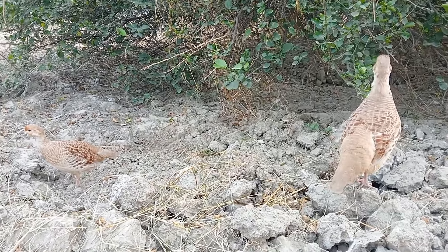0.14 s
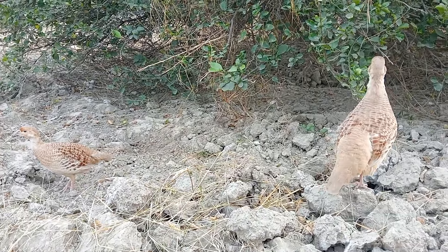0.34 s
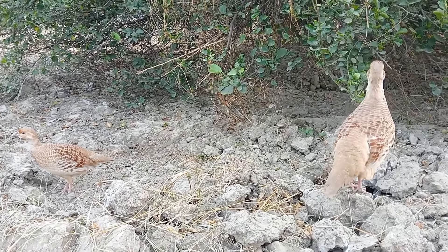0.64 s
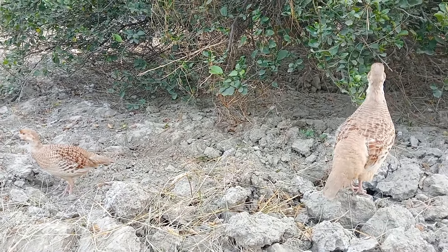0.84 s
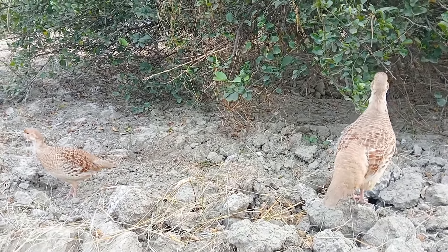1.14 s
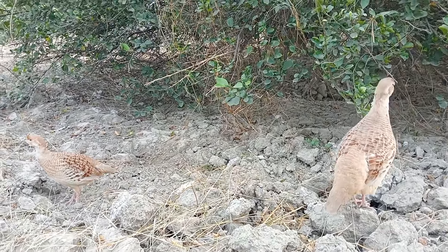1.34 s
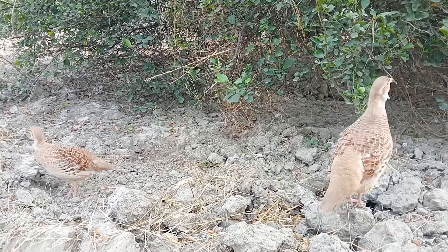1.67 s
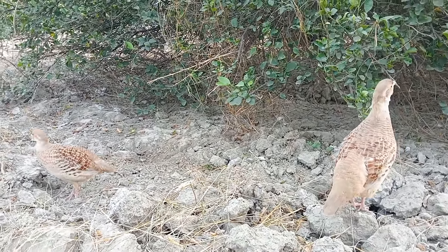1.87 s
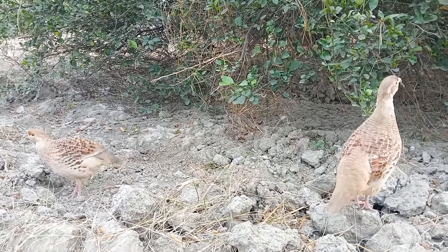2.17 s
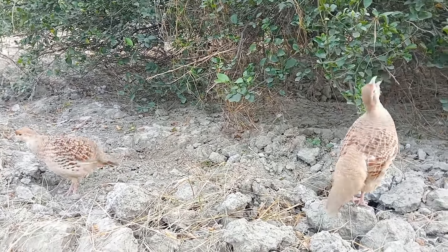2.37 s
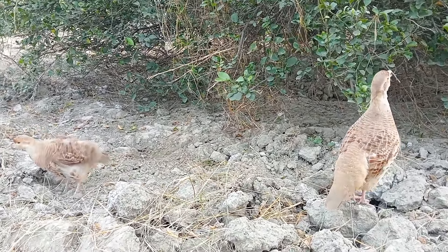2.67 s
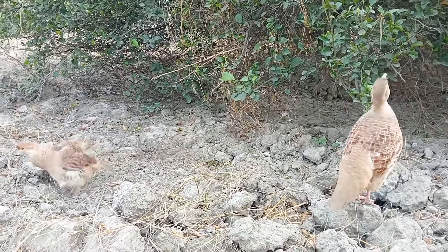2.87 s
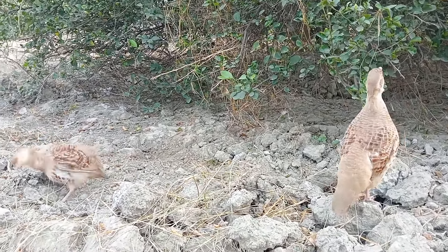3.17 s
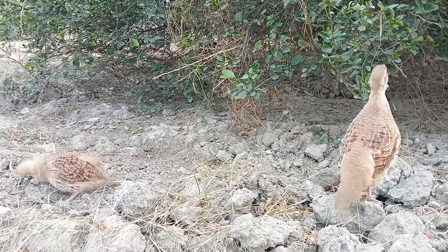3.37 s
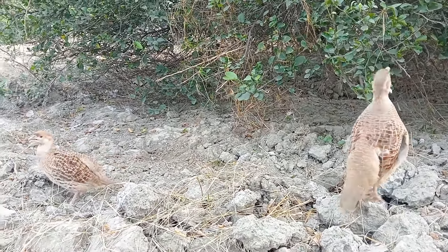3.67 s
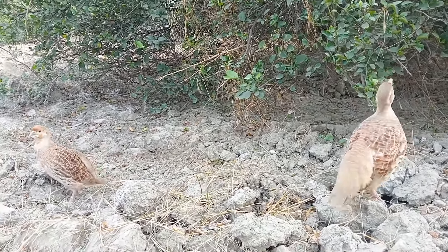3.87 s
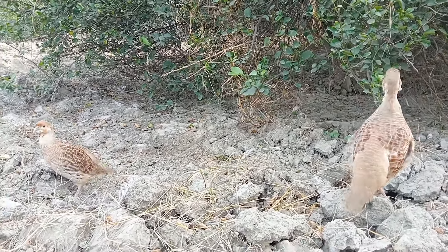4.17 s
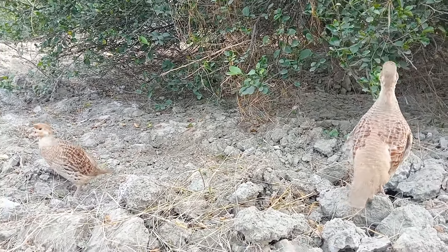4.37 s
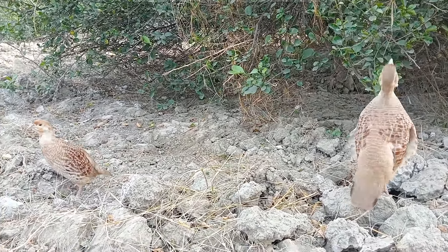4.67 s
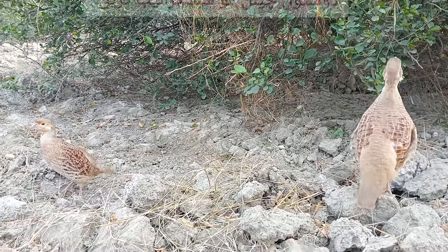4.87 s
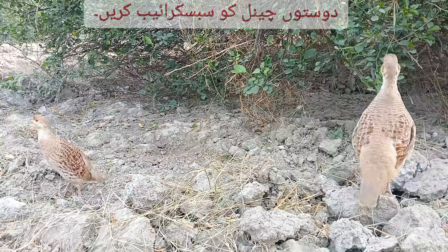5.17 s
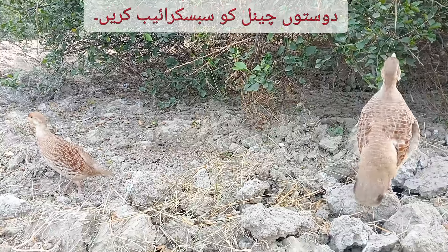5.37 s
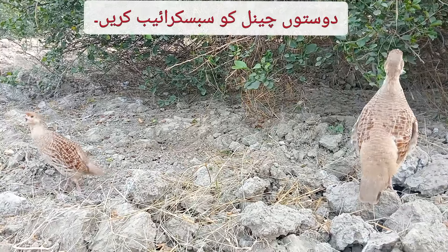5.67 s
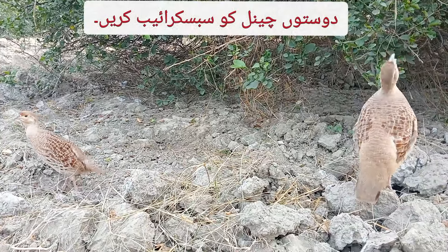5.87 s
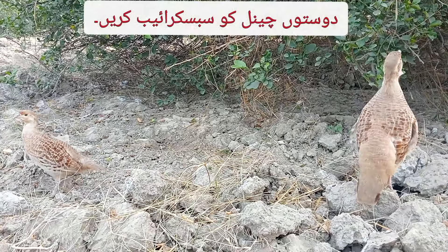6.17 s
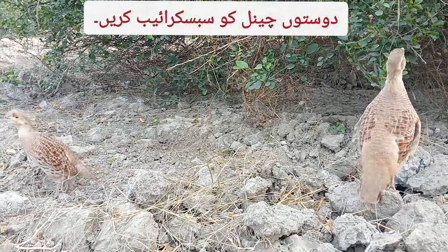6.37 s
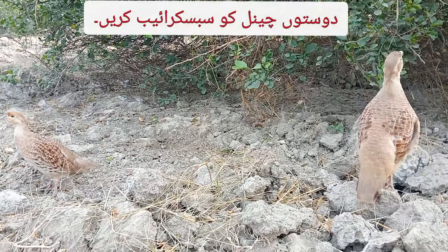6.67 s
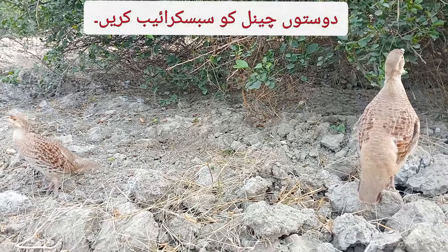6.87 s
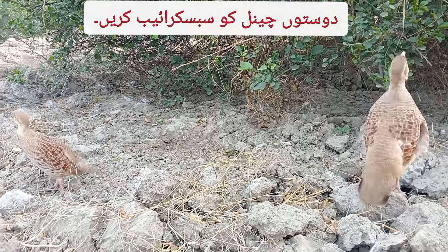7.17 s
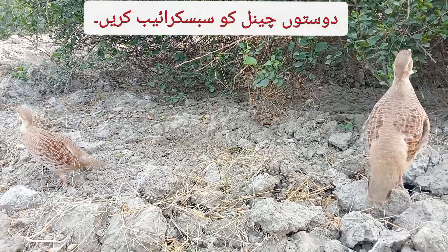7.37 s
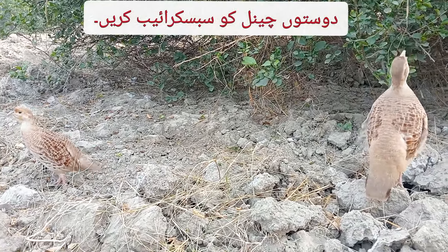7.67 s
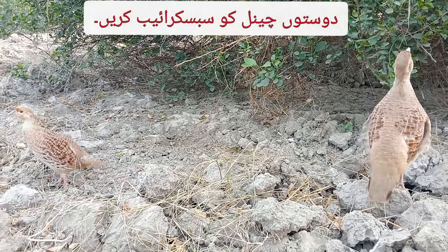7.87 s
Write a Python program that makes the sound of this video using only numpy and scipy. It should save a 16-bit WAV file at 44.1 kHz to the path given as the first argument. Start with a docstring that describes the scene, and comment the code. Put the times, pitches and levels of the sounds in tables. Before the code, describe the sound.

Close, shrill partridge calls repeat in a quick rhythm of clucks, whistles and harsh falling notes over faint open-air hiss.

```python
"""Low rumble, hiss and faint whistles on open ground; then a close grey francolin pips and mutters.
It repeats one phrase: clucks, a yelp into a whistle, a rasping 'kee' and a falling slur.
Its calls join rough rattles and sinking tones: syrinx pulses filtered by windpipe, throat and beak.
Stones and trees return a faint echo; a few dry ticks and rustles lie underneath.
Gain control ducks the whole mix under the loudest notes."""
import sys
import numpy as np
from scipy import signal
from scipy.fft import rfft, irfft, next_fast_len
from scipy.io import wavfile
from scipy.ndimage import uniform_filter1d, minimum_filter1d

SR = 44100
rng = np.random.default_rng(int(sys.argv[2]) if len(sys.argv) > 2 else 0)


def dump(signal):
    """Clip the signal to [-1, 1] and save it as 16-bit WAV at the path in sys.argv[1]."""
    limited = np.clip(np.atleast_2d(signal).T, -1, 1)
    pcm = np.round(limited * 32767).astype(np.int16)
    wavfile.write(sys.argv[1], SR, pcm)


N = 353682

# 'Kee' calls. Each row: tone start in seconds, tone level in dB, nominal pitch in Hz,
# then rattle length, slur delay and slur length in seconds.
KEE_CALLS = [(2.428, -1, 2078, .041, .063, .072), (3.008, -1, 2090, .042, .060, .074),
             (3.607, 0, 2088, .039, .064, .071), (3.987, -2, 2140, .048, .057, .071),
             (4.663, 0, 2106, .047, .059, .079), (5.351, -1, 2070, .043, .064, .079),
             (5.949, -1, 2070, .043, .063, .079), (6.551, -1, 2090, .043, .064, .079),
             (7.163, -1, 2078, .045, .063, .079), (7.767, -1, 2080, .044, .065, .079)]
# Clucks. Each row: tone start in seconds, rattle and tone levels in dB, pitch factor,
# tone length in seconds.
CLUCK_CALLS = [(2.680, -14, -12, .91, .046), (2.796, -15, -11, .89, .044), (3.267, -14, -11, 1.03, .043),
               (3.379, -14, -7, 1.02, .046), (3.503, -14, -13, .94, .022), (4.229, -12, -7, 1.06, .041),
               (4.344, -14, -7, 1.02, .040), (4.464, -17, -12, .96, .035), (4.927, -11, -9, 1.01, .043),
               (5.042, -13, -7, .95, .038), (5.163, -17, -15, .9, .036), (5.623, -13, -10, 1, .041),
               (5.734, -19, -17, .9, .036), (6.213, -13, -10, 1.01, .040), (6.331, -15, -12, .92, .046),
               (6.816, -12, -9, 1, .043), (6.936, -15, -13, .94, .046), (7.427, -12, -9, .98, .042),
               (7.541, -18, -16, .9, .038), (8.034, -11, -9, 1.1, .042)]
# Whistles. Each row: tone start in seconds, level in dB, pitch in Hz, length in seconds, mid sag in dB.
WHISTLE_CALLS = [(4.507, -8, 2456, .080, 0), (5.210, -8, 2468, .076, 0), (5.773, -9, 2458, .074, -1),
                 (6.399, -8, 2484, .073, -5), (7.003, -9, 2465, .075, -7), (7.592, -9, 2458, .071, -7)]
# Register jump. One row: tone start in seconds, nominal level in dB, low and high pitch in Hz,
# low and high length in seconds.
YODEL_CALL = (3.818, -9, 2430, 2962, .028, .046)
# Sharp pip. One row: tone start in seconds, level in dB.
PIP_CALL = (1.610, -10)
# Soft low notes. Each row: start and length in seconds, level in dB, mid pitch in Hz, glide in octaves.
MUTTER_CALLS = [(1.530, .05, -49, 480, -.7), (1.701, .048, -23, 530, -.2), (1.800, .048, -24, 530, -.1),
                (2.116, .05, -50, 560, -.8), (2.152, .08, -49, 510, -.9), (2.203, .075, -47, 560, -.9),
                (2.893, .026, -25, 800, 0)]
# Windpipe and beak response, for calls and for whistles. Each row: frequency in Hz, gain in dB.
CALL_TRACT = [(150, -47), (400, -13), (650, -10.5), (1050, -8.5), (1500, -3), (2100, -4.5), (3100, -2.5),
              (4200, -3.5), (5200, -3.5), (6200, -16), (7100, -33), (8500, -28), (12300, -43.5),
              (14800, -33.5)]
WHISTLE_TRACT = [(150, -42.5), (600, -39.5), (1050, 1.5), (1600, -3.5), (2500, -1.5), (4000, 8.5),
                 (5000, -2), (5950, 2), (6600, -15), (7400, -12.5), (8700, -17.5), (9900, -16.5),
                 (12300, -26.5), (14800, -23.5)]
# Thin, faint whistles. First three rows: fading ring of an earlier close call, with its overtones.
# Last two: late echoes of the francolin's whistles. Each row: start and length in seconds, level in dB,
# start, middle and end pitch in Hz, rms waver as a fraction of pitch.
FAINT_WHISTLES = [(-.12, 0.25, -55, 1790, 1750, 1750, 0.03), (-.12, 0.21, -65, 3580, 3570, 3560, .008),
                  (-.12, 0.21, -64, 5350, 5330, 5300, 0.02), (.62, 0.41, -60.5, 2280, 2090, 1950, 0.06),
                  (1.45, .11, -66, 3050, 3230, 2850, 0.03), (1.74, 0.11, -63, 2950, 3180, 3100, .004),
                  (1.86, .28, -61.5, 2300, 2150, 2010, 0.05), (2.03, 0.11, -62, 2800, 3120, 2670, 0.05),
                  (4.80, 0.46, -48.5, 2490, 2470, 2430, 0.02), (6.68, .3, -45.5, 2470, 2470, 2450, .006)]
# Far-off steady tones, same columns.
DISTANT_TONES = [(0, .85, -68, 810, 805, 800, .004), (.82, .45, -64, 645, 640, 638, .004),
                 (1.2, .5, -71, 640, 638, 636, .004), (.3, 1.1, -69, 1580, 1590, 1590, .012)]
# Dry ticks. Each row: start in seconds, peak in dB.
DRY_TICKS = [(2.070, -21), (2.769, -30), (2.891, -34)]
# Scuffs on dry ground. Each row: start and length in seconds, level in dB, centre in Hz.
GROUND_RUSTLES = [(.36, .25, -68, 3700), (1.17, .3, -76, 7500), (1.1, .45, -70, 3500),
                  (2.78, .16, -53, 330)]
# Rumble swells. Each row: peak time and half width in seconds, level in dB.
RUMBLE_SWELLS = [(.11, .04, -50), (.40, .05, -47), (.77, .22, -39), (1.09, .05, -46), (2.88, .08, -48),
                 (3.44, .06, -43), (3.87, .07, -50), (4.43, .05, -49), (6.35, .07, -43), (6.92, .14, -50),
                 (7.45, .04, -45), (7.64, .04, -46)]
# Spectra of echo, rumble and air hiss. Each row: frequency in Hz, relative density in dB.
ECHO_SPECTRUM = [(200, -7.5), (1000, -17), (2200, -1), (4200, -7), (6000, -2), (8000, -1), (15000, -11.5)]
RUMBLE_SPECTRUM = [(12, -65.5), (20, -37), (54, -3), (102, 0.5), (172, -12), (247, -18), (317, -29),
                   (390, -38.5), (450, -44.5), (580, -70), (990, -120)]
AIR_SPECTRUM = [(180, -32), (300, -3.5), (432, -5.5), (700, -6), (800, -8), (993, -10.5), (1340, -7.5),
                (3230, -17), (3750, -12), (5690, -34), (9360, -47.5), (14900, -47.5), (15900, -55.5)]

FADE_S, BAND_EDGE_HZ = .0022, 15750


def francolin():
    """The close bird. Each call is a list of (start in seconds, sound) gestures."""
    out = np.zeros(N)
    for call, rows in [(pip, [PIP_CALL]), (mutter, MUTTER_CALLS), (cluck, CLUCK_CALLS),
                       (whistle, WHISTLE_CALLS), (yodel, [YODEL_CALL]), (kee, KEE_CALLS)]:
        for row in rows:
            for start_s, sound in call(*row):
                add(out, start_s, sound)
    return out


def kee(at_s, db, hz, lead_s, slur_delay_s, slur_s, held_s=.046):
    """Loudest call: harsh rattle, ringing tone, catch, downward slur."""
    rasp = rattle(lead_s, db - 6.5, rise_s=.014, fall_db=16, pitch_hz=(450, 1200), rough=.72,
                  throat_hz=(2600, 4500), boost_db=14)
    held = tone(held_s + .001, db, hz * 1.005, hold=.72, fade_db=12, drop=.08, bend=14,
                rough=.015, fray=.25, half_db=-10.5, boost_db=-14, partial=2)
    catch = rattle(slur_delay_s - held_s, db - 9.5, pitch_hz=(1010, 1100), rough=.45,
                   throat_hz=(2900, 2800), boost_db=4)
    slur = tone(slur_s - FADE_S, db - 3.5, hz * .99, hold=.2, fade_db=29, drop=.29, bend=1.55,
                rough=.07, fray=1, half_db=-18, boost_db=-3, closing_db=15)
    return [(at_s - lead_s, rasp), (at_s - .002, held), (at_s + held_s, catch),
            (at_s + slur_delay_s, slur)]


def cluck(at_s, rattle_db, tone_db, pitch_factor, tone_s, lead_s=.026):
    """A rising rattle breaks into a fast-falling tone as the beak closes."""
    rise = rattle(lead_s + .002, rattle_db, rise_s=.026, rough=.38, throat_hz=(900, 2400), boost_db=11,
                  pitch_hz=(450 * pitch_factor, 1020 * pitch_factor))
    fall = tone(tone_s, tone_db, 1820 * pitch_factor, hold=.45, fade_db=33, drop=.34, bend=.88,
                rough=.19, fray=1, half_db=-11, boost_db=12, closing_db=30)
    return [(at_s - lead_s, rise), (at_s, fall)]


def whistle(at_s, db, hz, length_s, sag_db):
    """Yelp, pure tone, collapse."""
    return yelp(at_s) + [(at_s, pure_tone(length_s, db, hz, sag_db))] + collapse(at_s + length_s)


def yodel(at_s, db, low_hz, high_hz, low_s, high_s):
    """A whistle that jumps to a higher register."""
    low = pure_tone(low_s, db - 1.5, low_hz, fade_db=1.5, overshoot=.02)
    high = pure_tone(high_s, db + 1.5, high_hz, fade_db=4, boost_db=-7, overshoot=.008)
    return yelp(at_s, db=-12) + [(at_s, low), (at_s + low_s, high)] + collapse(at_s + low_s + high_s)


def pip(at_s, db, lead_s=.028):
    """Short rising rattle, then a bright, period-doubled tone."""
    rise = rattle(lead_s, db - 9, rise_s=.02, pitch_hz=(430, 950), rough=.6,
                  throat_hz=(2800, 2000), boost_db=3, half_db=-8)
    bright = tone(.072, db, 1712, hold=.6, fade_db=26, drop=.36, bend=5.5, rough=.012, fray=.8,
                  half_db=1, boost_db=16, closing_db=10, overshoot=.012)
    return [(at_s - lead_s, rise), (at_s, bright)]


def mutter(at_s, length_s, db, mid_hz, glide_oct, arch_oct=.3, edge_db=19):
    """Dull note, beak nearly shut; pitch and level arch."""
    _, progress = clock(length_s)
    edge = (2 * progress - 1) ** 2
    hz = mid_hz * 2 ** (glide_oct * (progress - .5) - arch_oct * edge)
    note = voice(hz, db - edge_db * edge, rough=.3, half_db=-18, throat_hz=np.full(len(hz), 1150),
                 boost_db=28, tract=CALL_TRACT, width_hz=420, loud_db=-8, dulling=.8)
    return [(at_s, note)]


def yelp(at_s, db=-7, length_s=.025, top_hz=2170, edge_db=10, lead_s=.034, catch_s=.012):
    """Whistle onset: the voice flips up in a rough arch, then catches in a rattle."""
    _, progress = clock(length_s)
    edge = abs(progress - .42)
    hz = top_hz * (1 - 1.3 * edge ** 2)
    flip = voice(hz, db - edge_db * edge / edge.max(), rough=.42, half_db=-11, throat_hz=2 * hz,
                 boost_db=1, tract=WHISTLE_TRACT)
    catch = rattle(catch_s, db - 8, fall_db=3, pitch_hz=(1080, 1250), rough=.55,
                   throat_hz=(3700, 3200), boost_db=2, tract=WHISTLE_TRACT)
    return [(at_s - lead_s, flip), (at_s - catch_s, catch)]


def pure_tone(length_s, db, hz, sag_db=0, fade_db=6, boost_db=3.5, overshoot=.036):
    """Whistle body: clean, nearly level; a sag weakens the fundamental most."""
    return tone(length_s, db, hz, hold=.6, fade_db=fade_db, drop=.025, bend=16, rough=.006, fray=.012,
                half_db=-44, boost_db=boost_db + .8 * sag_db, sag_db=sag_db, overshoot=overshoot,
                tract=WHISTLE_TRACT)


def collapse(at_s):
    """Whistle end: pitch drops into a dying rattle."""
    drop = rattle(.008, db=-13, fall_db=3, pitch_hz=(2000, 950), rough=.6,
                  throat_hz=(2400, 2000), boost_db=13, tract=WHISTLE_TRACT)
    tail = rattle(.022, db=-19, fall_db=17, pitch_hz=(1050, 1020), rough=.32,
                  throat_hz=(1150, 1100), boost_db=6, half_db=-22, tract=WHISTLE_TRACT)
    return [(at_s, drop), (at_s + .007, tail)]


def rattle(length_s, db, pitch_hz, rough, throat_hz, boost_db, rise_s=.001, rise_db=24, fall_db=0,
           half_db=-18, tract=CALL_TRACT):
    """Rough low register; pulse rate and throat resonance glide between (start, end) pairs."""
    t, progress = clock(length_s)
    attack_db = rise_db * np.maximum(1 - t / rise_s, 0) ** 2
    decay_db = fall_db * np.maximum(t - rise_s, 0) / length_s
    hz = np.interp(progress, [0, 1], pitch_hz)
    resonance_hz = np.interp(progress, [0, 1], throat_hz)
    return voice(hz, db - attack_db - decay_db, rough, half_db, resonance_hz, boost_db, tract)


def tone(length_s, db, hz, hold, fade_db, drop, bend, rough, fray, half_db, boost_db, closing_db=0,
         sag_db=0, partial=1, overshoot=.03, tract=CALL_TRACT, settle_s=.017, break_s=.0022):
    """High register: starts sharp, holds, fades, frays, doubles its period. Throat tracks a partial."""
    t, progress = clock(length_s)
    spent = np.maximum(progress - hold, 0) / max(1 - hold, .01)
    sink = 1 - drop * progress ** bend  # higher bend, later drop
    pitch_hz = hz * (1 + overshoot * np.exp(-t / settle_s)) * sink
    dip_db = sag_db * np.interp(progress, [0, .15, .4, .7, 1], [0, .3, 1, 1, 0])
    level_db = db - fade_db * spent ** 1.4 + dip_db
    roughness = rough + .55 * np.exp(-t / break_s) + fray * spent ** 2 - .004 * dip_db
    return voice(pitch_hz, level_db, roughness, half_db=half_db + 9 * spent - dip_db,
                 throat_hz=partial * pitch_hz, boost_db=boost_db + closing_db * progress, tract=tract)


def voice(hz, level_db, rough, half_db, throat_hz, boost_db, tract, width_hz=520, loud_db=-16,
          dulling=.5):
    """Syrinx through the windpipe and a moving throat resonance; soft notes lose overtones."""
    tilt_db_per_oct = dulling * np.minimum(level_db - loud_db, 0)
    source = syrinx(hz, np.clip(rough, 0, 1), half_db, tilt_db_per_oct)
    piped = signal.fftconvolve(source, impulse_response(tract))[:len(hz)]
    voiced = piped + amp(boost_db) * resonate(piped, throat_hz, width_hz)
    running_rms = np.sqrt(uniform_filter1d(voiced ** 2, size=350) + 1e-12)
    fades = signal.windows.tukey(len(hz), 2 * FADE_S * SR / len(hz))
    return voiced / running_rms * amp(level_db) * fades


def syrinx(hz, rough, half_db, tilt_db_per_oct, jitter=.15, shimmer=.48, puff_cycles=.31):
    """Alternating strong and weak pulses; roughness upsets timing and size and adds a puff to each."""
    size = len(hz)
    rate_hz = hz * np.exp(jitter * rough * wander(size, 900) + .002 * wander(size, 250))
    cycles = np.cumsum(rate_hz) / SR
    order = np.arange(1, 65)[:, None] / 2  # half orders carry the period doubling
    partial_hz = order * rate_hz
    weight = np.where(order % 1, amp(half_db), 1) * np.clip((BAND_EDGE_HZ - partial_hz) / 500 + 2, 0, 1)
    weight *= amp(tilt_db_per_oct * np.log2(np.maximum(partial_hz / 2000, 1)))
    pulses = (weight * np.cos(2 * np.pi * order * cycles)).sum(0) / np.sqrt((weight ** 2).sum(0) / 2)
    puffs = unit_rms(np.exp(-(cycles % 1) / puff_cycles) * rng.standard_normal(8192)[:size])
    breath = .65 * rough * amp(tilt_db_per_oct) * puffs
    return (pulses + breath) * np.exp(shimmer * rough * wander(size, 900))


def land_echo(sound, near_db=-23, near_t60_s=.14, far_db=-40.5, far_t60_s=.96):
    """Quick scatter from stones and bank, then a faint long echo from trees."""
    t = np.arange(int(1.5 * SR)) / SR
    near = unit_rms(noise(len(t), ECHO_SPECTRUM) * amp(-60 * t / near_t60_s) * (t > .002))
    far = unit_rms(noise(len(t), ECHO_SPECTRUM) * amp(-60 * t / far_t60_s) * (t > .03))
    response = (amp(near_db) * near + amp(far_db) * far) / np.sqrt(len(t))
    return signal.fftconvolve(sound, response)[:N]


def faint_notes(rows):
    """Wavering sines that swell and fade along a pitch curve."""
    out = np.zeros(N)
    for start_s, length_s, db, *curve_hz, waver in rows:
        progress = np.linspace(0, 1, int(length_s * SR))
        hz = np.polyval(np.polyfit([0, .5, 1], curve_hz, 2), progress)
        hz *= 1 + waver * wander(len(hz), 300)
        note = np.sin(np.pi * progress) * np.sin(2 * np.pi * np.cumsum(hz) / SR)
        add(out, start_s, amp(db) * unit_rms(note))
    return out


def ticks(decay_s=.00028):
    """Dry snaps: low-passed noise bursts."""
    out, t = np.zeros(N), np.arange(256) / SR
    for start_s, db in DRY_TICKS:
        snap = signal.lfilter([1], [1, -.6], rng.standard_normal(len(t)) * np.exp(-t / decay_s))
        add(out, start_s, amp(db) * snap / abs(snap).max())
    return out


def rustles(crinkle_db=4):
    """Scuffs on dry ground: short swells of crinkly band noise."""
    out = np.zeros(N)
    for start_s, length_s, db, hz in GROUND_RUSTLES:
        size = int(length_s * SR)
        band = noise(size, [(hz / 4, -45), (hz / 1.5, -15), (hz, 0), (hz * 1.5, -18), (hz * 4, -50)])
        envelope = np.hanning(size) * amp(crinkle_db * wander(size, 90))
        add(out, start_s, amp(db) * unit_rms(band * envelope))
    return out


def rumble(floor_db=-53):
    """Low noise with bell-shaped swells."""
    t = np.arange(N) / SR
    swells = sum(amp(db) * np.exp(-((t - peak_s) / width_s) ** 2)
                 for peak_s, width_s, db in RUMBLE_SWELLS)
    return noise(N, RUMBLE_SPECTRUM) * (amp(floor_db) + swells)


def air(db=-59, drift_db=1.5):
    """Faint open-air hiss, level drifting."""
    return noise(N, AIR_SPECTRUM) * amp(db + drift_db * wander(N, 3.6))


def amp(db):
    """Decibels to gain."""
    return 10 ** (np.asarray(db) / 20)


def unit_rms(x):
    """Scale to rms 1."""
    return x / np.sqrt(np.mean(x ** 2) + 1e-20)


def clock(length_s):
    """Gesture time in seconds and as progress 0-1, with one fade of overlap."""
    t = np.arange(0, length_s + FADE_S, 1 / SR)
    return t, t / t[-1]


def add(mix, start_s, sound):
    """Mix in a sound, cropped at both ends of the mix."""
    start = round(start_s * SR)
    sound = sound[max(-start, 0):]
    part = mix[max(start, 0):][:len(sound)]
    part += sound[:len(part)]


def gain_at(spectrum, hz):
    """Gain from (Hz, dB) points, interpolated over log frequency."""
    points_hz, db = np.transpose(spectrum)
    return amp(np.interp(np.log(hz + 1), np.log(points_hz + 1), db))


def noise(size, spectrum):
    """Coloured noise, rms 1."""
    padded = next_fast_len(size)
    bins = rfft(rng.standard_normal(size), padded) * gain_at(spectrum, np.fft.rfftfreq(padded, 1 / SR))
    return unit_rms(irfft(bins, padded)[:size])


def wander(size, knots_per_s):
    """Random drift, rms 1."""
    knots = rng.standard_normal(512)
    return unit_rms(np.interp(np.arange(size) * knots_per_s / SR, np.arange(len(knots)), knots))


def impulse_response(spectrum, size=1024):
    """Causal filter with this spectrum."""
    log_gain = np.log(gain_at(spectrum, abs(np.fft.fftfreq(size, 1 / SR))))
    return np.fft.ifft(np.exp(np.conj(signal.hilbert(log_gain)))).real[:size // 2]


def resonate(x, hz, width_hz):
    """Unity-gain resonance following the curve hz."""
    carrier = np.exp(2j * np.pi * np.cumsum(hz) / SR)
    pole = np.exp(-np.pi * width_hz / SR)
    return 2 * (carrier * signal.lfilter([1 - pole], [1, -pole], x / carrier)).real


def scene():
    """Bird, echo and countryside, mono."""
    bird = francolin()
    mix = bird + land_echo(bird) + faint_notes(FAINT_WHISTLES) + faint_notes(DISTANT_TONES)
    return (mix + ticks() + rumble() + air() + rustles())[None]


def record(dry):
    """Gain control, full-scale peak limiter, low-pass."""
    threshold_db, attack_s, release_db_per_s = -8, .002, 100
    power_db = 10 * np.log10(abs(uniform_filter1d(dry[0] ** 2, size=130)) + 1e-12)
    release_db = np.arange(N) / SR * release_db_per_s
    held_db = np.maximum.accumulate(power_db + release_db) - release_db
    over_db = np.maximum(held_db - threshold_db, 0)
    pole = np.exp(-1 / (attack_s * SR))
    ducked = dry / amp(signal.lfilter([1 - pole], [1, -pole], over_db))
    safe_gain = 1 / np.maximum(abs(ducked[0]), 1)
    limited = ducked * uniform_filter1d(minimum_filter1d(safe_gain, size=65), size=65)
    lowpass = signal.firwin(301, BAND_EDGE_HZ, window=("kaiser", 8), fs=SR)
    return signal.oaconvolve(limited, lowpass[None], "same")


dry = scene()
out = record(dry)
dump(out)
```